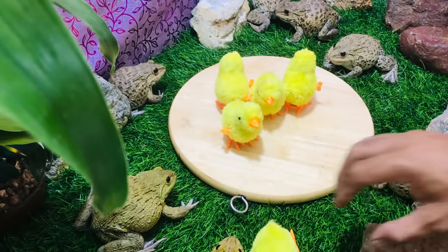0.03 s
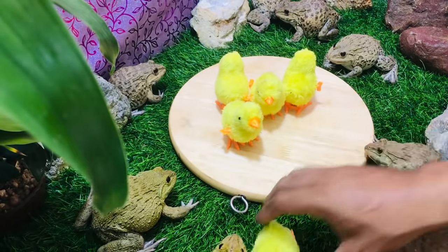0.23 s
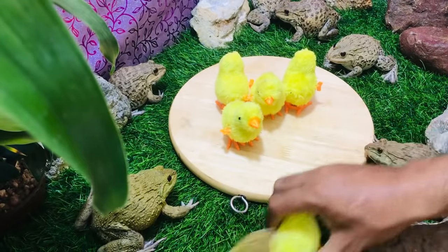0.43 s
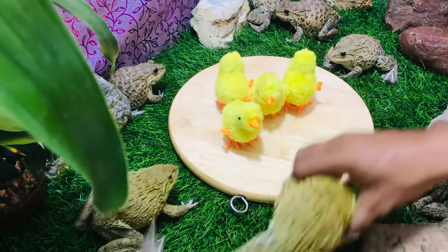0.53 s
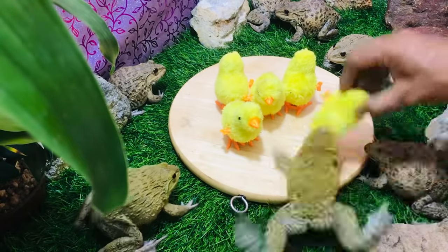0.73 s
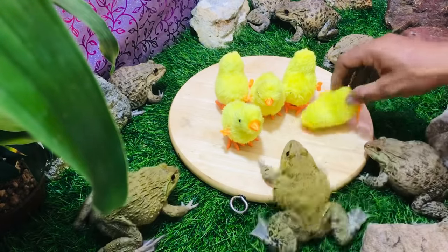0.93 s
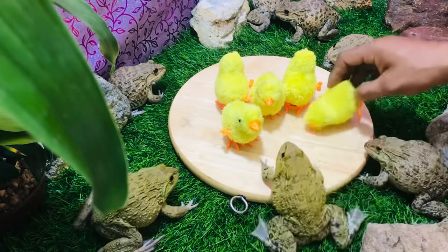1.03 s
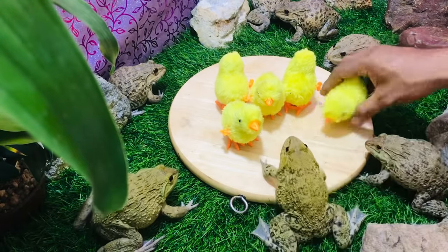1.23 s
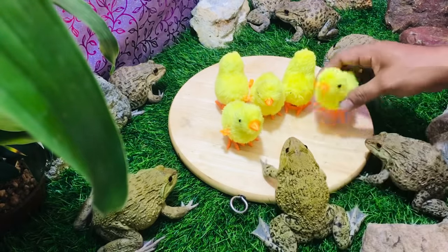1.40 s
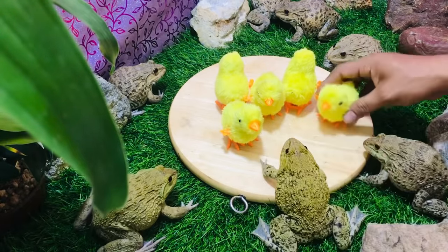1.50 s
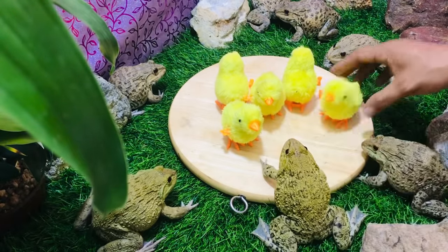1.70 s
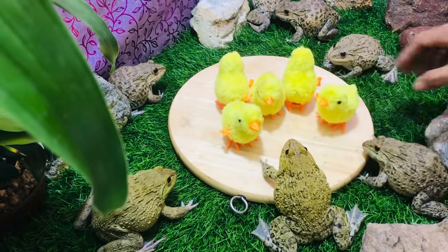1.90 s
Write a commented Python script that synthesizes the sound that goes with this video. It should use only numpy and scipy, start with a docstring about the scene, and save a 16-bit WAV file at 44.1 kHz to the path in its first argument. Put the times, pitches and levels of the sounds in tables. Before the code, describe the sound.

Piercing frog scream breaking into a yelp and raspy screech, followed by light toy clicks on wood

```python
"""A frog is picked up and squeals: a long scream breaks into a loud yelp, then a harsh screech that
sinks into a rattle, and a weak whimper. Vocal-fold pulses and chopped air excite throat resonances.
Then a small plastic toy is tapped down on a wooden board: short noise cracks with a faint ring.
Thin rustles and a falling squeak come from shaped noise and a gliding sine. A live room, made of near
reflections and a decaying noise tail, rings after frog and taps, over a low rumble and a faint hiss."""
import sys
import numpy as np
from scipy import signal
from scipy.fft import rfft, irfft
from scipy.io import wavfile
from scipy.ndimage import uniform_filter1d, minimum_filter1d

SR = 44100
rng = np.random.default_rng(int(sys.argv[2]) if len(sys.argv) > 2 else 0)


def wrap_up_sound(samples):
    """Save the sound to the file named by the first command line argument, as 16-bit audio."""
    columns = np.atleast_2d(samples).T
    # keep every value between -1 and 1, then stretch to whole-number steps
    tamed = np.clip(columns, -1, 1)
    steps = np.round(tamed * 32767).astype(np.int16)
    wavfile.write(sys.argv[1], SR, steps)


N = 85995
TIME = np.arange(N) / SR

# Background spectra. Each row: frequency in Hz, relative density in dB per Hz.
RUMBLE_SPECTRUM = [(20,-27),(35,-10.5),(50,-1.5),(65,3.5),(95,1.5),(150,-13),(210,-12.5),(300,-26),(450,-43.5)]
HISS_SPECTRUM = [(200,-3.5),(300,0.5),(700,-2),(1400,-3.5),(2500,-14.5),(5000,-16.5),(8500,-19),(10000,-12.5),(11200,-3.5),(12500,-19),(16000,-30.5)]
# Level of the rumble. Each row: time in seconds, level in dB.
RUMBLE_LEVEL = [(0.0, -57), (0.08, -51), (0.222, -64), (0.248, -49), (0.466, -54.5), (0.516, -67),
                (0.58, -55.5), (0.65, -65), (0.82, -53.5), (0.862, -65), (1.308, -53), (1.394, -57),
                (1.542, -48.5), (1.568, -59.5), (1.814, -49), (1.95, -54.5)]
HISS_DB = -60

# Colour of the room's tail. Each row: frequency in Hz, relative level in dB.
ROOM_COLOUR = [(300,-1.5),(600,7.5),(1100,8.5),(1700,-2),(4000,1),(7000,0.5),(11000,-2.5),(13500,-3),(16000,-4.5)]
# Near reflections. Each row: delay in seconds, gain as a signed ratio.
REFLECTIONS = [(.00063,0.11),(.00192,0.083),(.0035,-.1),(.009,0.13),(0.0117,.1)]
ROOM_T60_S, ROOM_TREBLE_T60_S, ROOM_ONSET_S = 0.7, 0.55, 0.0034
ROOM_SPLIT_HZ = 9000  # the treble decay applies above this
FROG_ROOM_DB, TAP_ROOM_DB = -15, -11.5

# A faint squeak: centre, half-length, mean pitch at the centre, mean fall, relative waver, peak level.
SQUEAK_S, SQUEAK_WIDTH_S, SQUEAK_HZ, SQUEAK_FALL_HZ_PER_S = 1.37, 0.025, 6550, 18000
SQUEAK_WAVER, SQUEAK_WAVER_PER_S, SQUEAK_DB = 0.02, 598.4, -63

# Faint rustles of hand and toy on the turf and board.
# Each row: centre in seconds, half-length in seconds, level in dB.
RUSTLES = [(0.054,0.057,-56),(0.136,0.031,-54),(1.075,0.097,-53),(1.205,0.085,-54.5),(1.375,0.027,-53)]
# Spectrum of the rustles. Each row: frequency in Hz, relative level in dB.
RUSTLE_COLOUR = [(1000,-17),(3000,-6),(5000,-17.5),(6500,-16.5),(7700,-15.5),(9400,-2.5),(11300,0),(12800,-7.5),(15000,-27)]

# Taps of the toy and small knocks of handling.
# Each row: start in seconds, level in dB before the common trim, tilt in dB per octave.
TAPS = [(.181,-41.5,-8),(0.1897,-34,-5.5),(.886,-34,-4.5),(1.134,-24,0),(1.282,-49,-3),(1.463,-53.5,-3),(1.516,-40,-3),(1.523,-20.5,0),(1.645,-21,1.5),(1.756,-21,0.66),(1.820,-21.5,2),(1.858,-41.5,-4.5)]
# Spectrum of a tap before its tilt. Each row: frequency in Hz, relative level in dB.
TAP_COLOUR = [(20,-74),(100,-31),(250,-23.5),(600,-11),(1100,-13.5),(2000,-7.5),(3500,-6.5),(5500,-5.5),(7600,-4),(9200,1.5),(11000,0),(13300,3.5),(14500,-1.5),(16000,-9.5)]
TAP_TRIM_DB = -1
TAP_ATTACK_S, TAP_HOLD_S, TAP_T60_S = 0.0018, 0.0027, 0.02
TAP_RING_DB, TAP_RING_T60_S = -14, 0.06  # ring against crack, and its decay

# Pitch of each cry. Each row: time in seconds, mean pitch in Hz.
SCREAM_PITCH = [(0.2, 600), (0.204, 752), (0.208, 910), (0.214, 1141), (0.22, 1338), (0.23, 1443),
                (0.236, 1503), (0.258, 1498), (0.4, 1282), (0.434, 1155), (0.462, 1229), (0.487, 1181)]
YELP_PITCH = [(0.489, 1284), (0.501, 1338), (0.535, 1350), (0.547, 1274), (0.553, 1190)]
SCREECH_PITCH = [(0.558, 1189), (0.566, 1432), (0.572, 1567), (0.6, 1563), (0.612, 1533), (0.622, 1320),
                 (0.648, 1060), (0.652, 982), (0.666, 654), (0.676, 596.7), (0.682, 594.4), (0.715, 578.7)]
WHIMPER_PITCH = [(0.718, 727.6), (0.728, 985), (0.738, 1227), (0.754, 1241), (0.778, 1141), (0.79, 1140),
                 (0.812, 767.4), (0.826, 645), (0.848, 565.6), (0.9, 549.3)]
# Bounds of the four registers, in Hz.
REGISTER_EDGES_HZ = [400, 3200, 7000, 10300, 16500]
# Register levels of each cry, before its own trim.
# Each row: time in seconds, then low, middle, high and top register level in dB.
SCREAM_LEVEL = [(0.2, -27, -43, -49.5, -52.5), (0.208, -17, -6, -26.5, -26),
                (0.218, -21, -13.5, -7.5, -15.5), (0.23, -14, -14, -10, -20), (0.258, -24, -25, -16, -30.5),
                (0.274, -15, -25, -9, -26.5), (0.284, -21, -13, -29, -19.5),
                (0.304, -16.5, -27, -10, -29.5), (0.32, -21.5, -19, -13.5, -26.5),
                (0.378, -20.5, -25, -23.5, -28.5), (0.438, -29, -27.5, -15, -20),
                (0.452, -21, -27, -32.5, -11.5), (0.458, -26.5, -26.5, -15, -14),
                (0.487, -22.5, -17.5, -13.5, -10.5)]
YELP_LEVEL = [(0.489, -15, -20, -15, -15.5), (0.509, -14.5, -9.5, -19, -24.5), (0.525, -8.5, -15, -20, -24),
              (0.539, -10.5, -13.5, -19.5, -26), (0.553, -22, -29, -29, -31.5)]
SCREECH_LEVEL = [(0.557, -25, -10.5, -23, -25), (0.565, -21, -10, -11.5, -9),
                 (0.593, -29.5, -12.5, -16, -17.5), (0.621, -30, -13, -20, -17),
                 (0.699, -39.5, -31, -35, -33.5), (0.715, -36.5, -51, -41, -35)]
WHIMPER_LEVEL = [(0.718, -40, -37, -33, -30), (0.736, -26, -24.5, -27, -17),
                 (0.75, -22.5, -39, -17.5, -19.5), (0.782, -34, -22, -33.5, -19.5),
                 (0.796, -34, -28, -22, -20.5), (0.81, -29, -32.5, -29.5, -20.5),
                 (0.9, -47.5, -60, -55, -46)]
# Throat and mouth resonances of each cry. Each row: frequency in Hz, relative level in dB.
SCREAM_THROAT = [(550,-20.5),(800,-18),(1180,-17.5),(1500,-18.5),(1680,-25.5),(1850,-19.5),(2050,-13.5),(2450,-4),(2950,0.5),(3300,-6),(3700,-2),(4600,-6),(5800,2.5),(7500,-5),(9200,0),(11000,-4.5),(12200,-1),(13700,-13.5),(15500,-12)]
YELP_THROAT = [(600,-20.5),(1330,-12),(1900,-21.5),(2700,0),(4000,-8),(5400,-7.5),(6700,-15),(8100,-9),(10700,-13.5),(13700,-24.5),(15000,-29.5)]
SCREECH_THROAT = [(400,-31),(600,-10),(950,-11.5),(1500,-13),(2000,-13.5),(3000,-6),(4100,6),(4800,-5),(5500,-9),(6300,-9.5),(8200,-1.5),(10000,-4.5),(11300,7.5),(12600,-5.5),(13500,-18),(14300,-10.5),(15500,-11.5)]
WHIMPER_THROAT = [(350,-29),(600,6),(1200,-14),(1800,-12),(2480,-1.5),(3000,-13.5),(3500,-5.5),(4200,-29),(5000,-5.5),(6500,-9.5),(8500,-7.5),(10000,-3.5),(12500,5.5),(15500,-6.5)]
# Roughness of the voice. Each row: time in seconds, rasp in dB, half-pitch undertone in dB.
ROUGHNESS = [(.2,-14.5,-21),(.215,-0.5,-9.5),(.245,-17.5,-36.5),(.29,-24.5,-22),(.35,-20.5,-18),(.40,-17.5,-25.5),(.45,-19,-40.5),(.48,-21.5,-42),(.492,-11.5,-27),(.515,-34,-37.5),(.542,-11,-19),(.56,2,-2),(.578,-11,-16),(.603,-11,-17),(.62,-5,-12.5),(.66,-5.5,-15),(.72,-8,-16.5),(.742,-18.5,-28.5),(.785,-16,-30.5),(.82,-10.5,-21),(.9,-9,-29)]
# Brightness of the rushing air. Each row: frequency in Hz, relative level in dB.
AIR_COLOUR = [(500,-8.5),(1800,-7.5),(3500,0),(8000,3),(13000,2)]
# Delays of the short echoes in the mouth, in seconds.
SMEAR_S = [.00023, .00061]
SMEAR_GAIN = 0.86
# Full rasp means 0 dB; the rates are corner frequencies of the random drift, in Hz.
JITTER, JITTER_PER_S = 0.035, 410  # relative pitch spread at full rasp
WAVER, WAVER_PER_S = 0.0034, 70  # relative pitch spread at all times
FLUTTER_DB, FLUTTER_PER_S = 3.5, 49  # each overtone swells and fades on its own
SHIMMER_DB, SHIMMER_PER_S = 7.5, 43  # bound of the loudness flutter at full rasp
AIR_DB = -5  # air against the pulses at full rasp
CRY_FADE_S = 0.0017

CUTOFF_HZ = 16000


def from_db(db):
    """Level to gain: 20 dB is a tenfold amplitude."""
    return 10 ** (np.asarray(db) / 20)


def rms_one(x):
    """Normalise to unit root-mean-square."""
    return x / np.sqrt(np.mean(x ** 2) + 1e-20)


def in_time(rows):
    """Linear interpolation of each column over time."""
    seconds, *columns = np.transpose(rows)
    return [np.interp(TIME, seconds, column) for column in columns]


def drift(rate):
    """Random drift of unit spread: white noise through a double real pole."""
    pole = np.exp(-2 * np.pi * rate / SR)
    return rms_one(signal.lfilter([1], [1, -2 * pole, pole * pole], rng.standard_normal(N)))


def coloured(x, points, tilt_db=0):
    """Linear filtering by a spectrum and a tilt per octave, keeping the power of white noise."""
    hz, db = np.transpose(points)
    octave = np.log2(np.maximum(np.fft.rfftfreq(len(x), 1 / SR), 1))
    response = rms_one(from_db(np.interp(octave, np.log2(hz), db) + tilt_db * octave))
    return irfft(rfft(x) * response, len(x))


def band(x, low_hz, high_hz):
    """Zero-phase band-pass with steep Butterworth slopes."""
    sos = signal.butter(5, [low_hz, high_hz], "band", fs=SR, output="sos")
    return signal.sosfiltfilt(sos, x)


def background():
    """Filtered noise: a low rumble of uneven level, and a steady faint hiss."""
    rumble = from_db(in_time(RUMBLE_LEVEL)[0]) * coloured(rng.standard_normal(N), RUMBLE_SPECTRUM)
    hiss = from_db(HISS_DB) * coloured(rng.standard_normal(N), HISS_SPECTRUM)
    return rumble + hiss


def near_reflections(x):
    """Discrete early reflections: delayed, scaled copies of the direct sound."""
    return sum(gain * np.interp(TIME - delay, TIME, x, left=0) for delay, gain in REFLECTIONS)


def room(x):
    """Diffuse reverberation: convolution with exponentially decaying noise whose treble dies sooner."""
    low_pass = signal.butter(2, ROOM_SPLIT_HZ, fs=SR, output="sos")
    high_pass = signal.butter(2, ROOM_SPLIT_HZ, "high", fs=SR, output="sos")
    low = coloured(signal.sosfilt(low_pass, rng.standard_normal(N)), ROOM_COLOUR)
    high = coloured(signal.sosfilt(high_pass, rng.standard_normal(N)), ROOM_COLOUR)
    tail = low * from_db(-60 * TIME / ROOM_T60_S) + high * from_db(-60 * TIME / ROOM_TREBLE_T60_S)
    tail = tail * np.minimum(TIME / ROOM_ONSET_S, 1)
    return signal.fftconvolve(x, tail / np.sqrt(np.sum(tail ** 2)))[:N]


def squeak():
    """Frequency modulation: a thin, unsteady sine slides down while the toy is turned."""
    age = TIME - SQUEAK_S
    glide = np.clip(SQUEAK_HZ - SQUEAK_FALL_HZ_PER_S * age, 0, SR / 2)
    hz = glide * (1 + SQUEAK_WAVER * drift(SQUEAK_WAVER_PER_S))
    swell = np.exp(-(age / SQUEAK_WIDTH_S) ** 2)
    return from_db(SQUEAK_DB) * swell * np.sin(2 * np.pi * np.cumsum(hz) / SR)


def rustles():
    """Sliding friction: coloured noise under bell-shaped swells gives thin swishes."""
    swell = sum(from_db(db) * np.exp(-((TIME - s) / width) ** 2) for s, width, db in RUSTLES)
    return swell * coloured(rng.standard_normal(N), RUSTLE_COLOUR)


def taps():
    """Impact: each contact is a dense noise crack of light plastic with a short, faint ring."""
    out = np.zeros(N)
    for start, db, tilt_db in TAPS:
        age = np.maximum(TIME - start, 0)
        attack = np.minimum(age / TAP_ATTACK_S, 1)
        crack = from_db(-60 * np.clip(age - TAP_HOLD_S, 0, 10 * TAP_T60_S) / TAP_T60_S)
        ring = from_db(TAP_RING_DB - 60 * age / TAP_RING_T60_S)
        noise = coloured(rng.standard_normal(N), TAP_COLOUR, tilt_db)
        out += from_db(db + TAP_TRIM_DB) * attack * (crack + ring) * noise
    return out


def vocal_folds(pitch, count=28):
    """Harmonic source: jittered pulses alternate strong and weak, and air chopped at the pitch adds rasp."""
    rasp, undertone = from_db(in_time(ROUGHNESS))
    hz = pitch * (1 + JITTER * rasp * drift(JITTER_PER_S) + WAVER * drift(WAVER_PER_S))
    phase = 2 * np.pi * np.cumsum(hz) / SR
    pulses = np.zeros(N)
    for k in range(1, count):
        flutter = from_db(FLUTTER_DB * drift(FLUTTER_PER_S))
        pulses += np.cos(k * phase) * (k * pitch < SR / 2) * flutter
    alternation = 1 + np.sqrt(2) * undertone * np.cos(phase / 2)
    air = rms_one(coloured(rng.standard_normal(N) * (1 + np.cos(phase)), AIR_COLOUR))
    return rms_one(pulses) * alternation + from_db(AIR_DB) * rasp * air


def smear(x):
    """All-pass dispersion: short echoes in the mouth spread each pulse without colouring it."""
    for delay in SMEAR_S:
        turn = np.exp(-2j * np.pi * np.fft.rfftfreq(N, 1 / SR) * delay)
        x = irfft(rfft(x) * (turn - SMEAR_GAIN) / (1 - SMEAR_GAIN * turn), N)
    return x


def cry(pitch_rows, level_rows, throat, level_db):
    """Source and filter: the folds sound through the throat, each register at its own level."""
    voice = coloured(smear(vocal_folds(in_time(pitch_rows)[0])), throat)
    out = 0
    for low, high, db in zip(REGISTER_EDGES_HZ, REGISTER_EDGES_HZ[1:], in_time(level_rows)):
        part = band(voice, low, high)
        # flatten the register to unit running power, then impose its level
        power = np.abs(uniform_filter1d(part ** 2, size=400))
        out = out + from_db(db + level_db) * part / np.sqrt(power + 1e-9)
    inside = np.minimum(TIME - level_rows[0][0], level_rows[-1][0] - TIME)
    gate = np.clip(inside / CRY_FADE_S + 2, 0, 1)  # the fades lie just outside the rows
    rasp = from_db(in_time(ROUGHNESS)[0])
    return out * gate * from_db(SHIMMER_DB * rasp * np.tanh(drift(SHIMMER_PER_S)))


def frog():
    """Superposition: four cries run into one another."""
    return (cry(SCREAM_PITCH, SCREAM_LEVEL, SCREAM_THROAT, level_db=-1.44)
            + cry(YELP_PITCH, YELP_LEVEL, YELP_THROAT, level_db=-0.86)
            + cry(SCREECH_PITCH, SCREECH_LEVEL, SCREECH_THROAT, level_db=0.3)
            + cry(WHIMPER_PITCH, WHIMPER_LEVEL, WHIMPER_THROAT, level_db=-3.92))


def scene():
    """Superposition of direct sound, near reflections, reverberation and the faint layers."""
    voice, toy = frog(), taps()
    direct = voice + toy
    reverberation = room(from_db(FROG_ROOM_DB) * voice + from_db(TAP_ROOM_DB) * toy)
    faint = rustles() + squeak() + background()
    return (direct + near_reflections(direct) + reverberation + faint)[None]


def record(dry):
    """Peak limiting by a smoothed gain, then a steep low-pass."""
    needed = 1 / np.maximum(np.abs(dry), 1)
    gain = uniform_filter1d(minimum_filter1d(needed, size=129), size=129)
    low_pass = signal.ellip(10, .05, 50, CUTOFF_HZ, fs=SR, output="sos")
    return signal.sosfiltfilt(low_pass, dry * gain)


dry = scene()
out = record(dry)
wrap_up_sound(out)
```